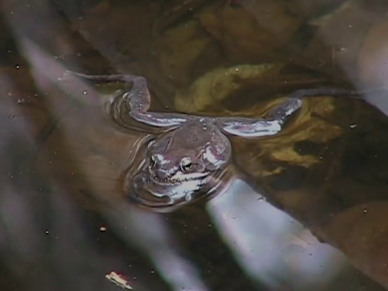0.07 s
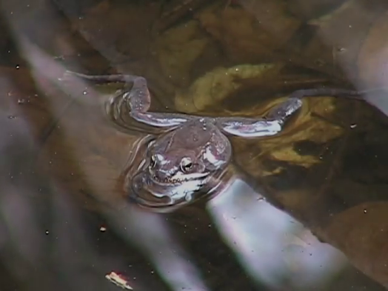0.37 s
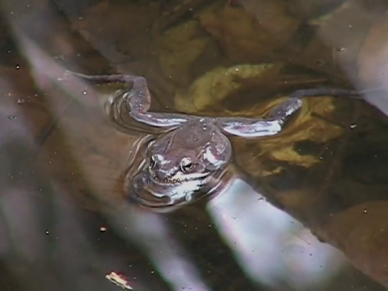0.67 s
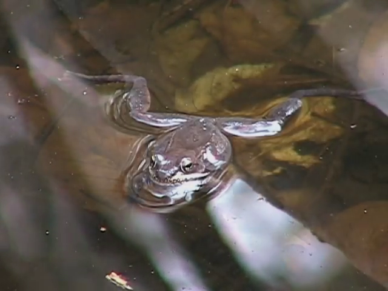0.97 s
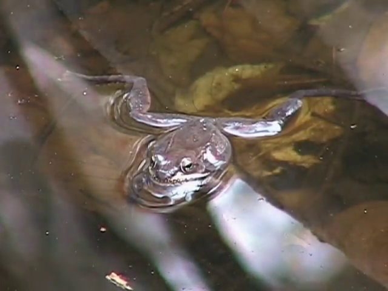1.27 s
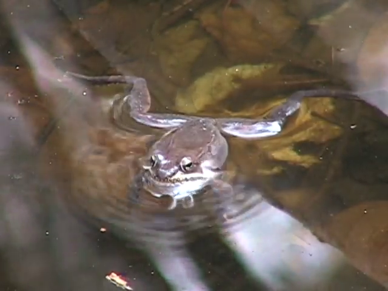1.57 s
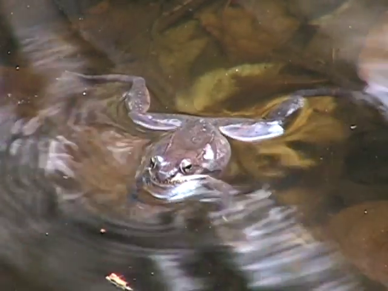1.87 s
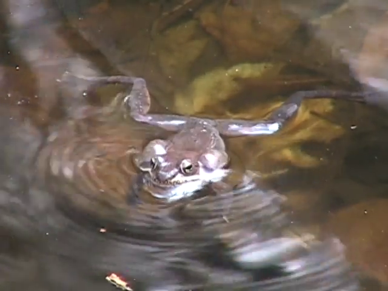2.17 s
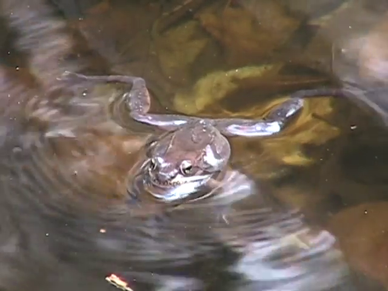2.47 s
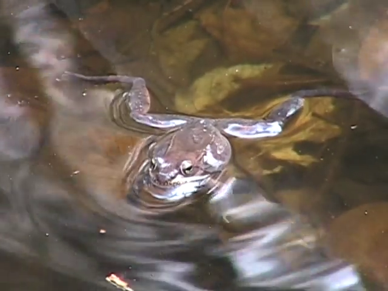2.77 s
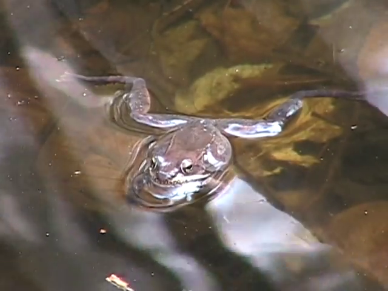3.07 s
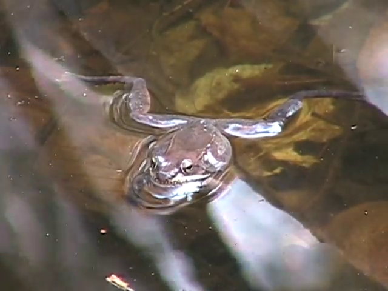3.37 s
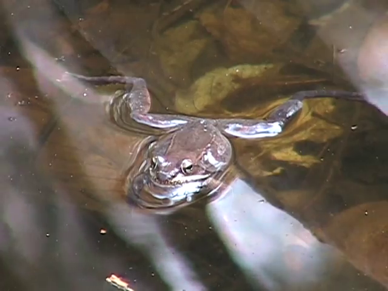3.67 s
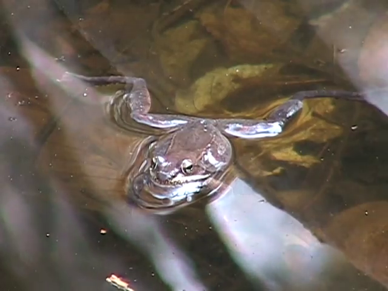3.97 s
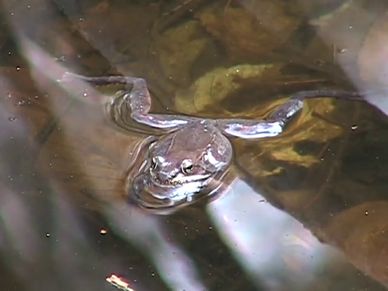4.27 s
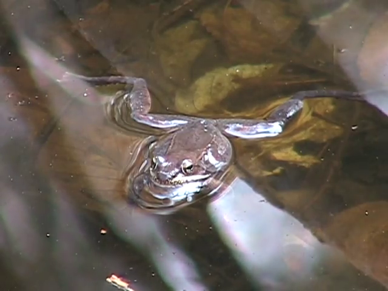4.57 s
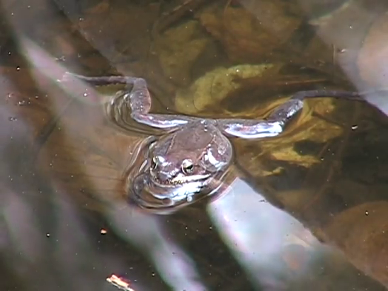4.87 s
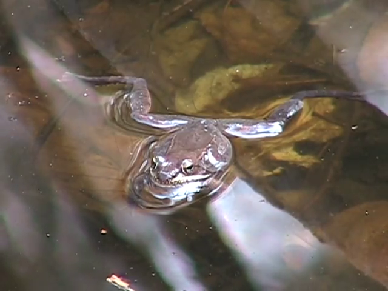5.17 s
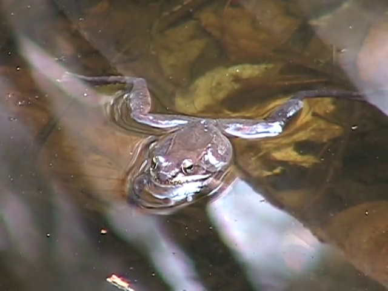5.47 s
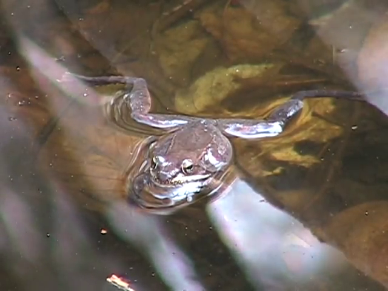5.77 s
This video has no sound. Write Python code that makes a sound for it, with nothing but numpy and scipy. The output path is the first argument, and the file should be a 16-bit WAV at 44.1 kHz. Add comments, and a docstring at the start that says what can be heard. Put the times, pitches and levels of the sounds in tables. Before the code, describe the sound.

Frogs croak in a shallow woodland pool for about six seconds. Many distant ones overlap into an unbroken gabble that gently rises and falls, while a few close ones give very short, throaty, mid-pitched clucks from left and right, each with a dull echo. The chorus thins slightly around 1.7 seconds, then close calls bunch up from 2 to 2.6 seconds. Single strong croaks stand out near 3.4 and 4.1 seconds, and a busy run goes from 4.9 seconds to the end. Thin, faint, falling squeaks appear around 1.4 and 2.1 seconds and several times after 5. A small dry tick comes at about 1.75 seconds, with fainter ones earlier. The water gives a tiny plop at the start and a soft one with a tick at 3 seconds. Low air rumble, light hiss and a very faint camera motor hum and whine continue underneath.

```python
"""Wood frogs croak in a shallow woodland pool, a few close by and many farther off.
Each croak is a short, quickening run of pulses from the voice box that makes the throat sacs ring;
their pitch sinks as they swell. Thin squeaks fall among the calls, and trunks and banks echo them.
The water plops softly, with a few dry ticks. Behind it all the air rumbles and hisses,
and a small camera motor hums and whines."""
import sys
import numpy as np
from scipy import signal
from scipy.io import wavfile

SR = 44100
rng = np.random.default_rng(int(sys.argv[2]) if len(sys.argv) > 2 else 0)


def dump_mix(stems):
    """Bounce the given channels to the path in sys.argv[1] as a 16-bit WAV at rate SR."""
    frames = np.atleast_2d(stems).T  # one column per channel
    limited = np.clip(frames, -1, 1)  # hard clip at full scale
    pcm = np.round(limited * 32767).astype(np.int16)
    wavfile.write(sys.argv[1], SR, pcm)


N = 260631
TIME = np.arange(N) / SR
SAC_HZ = 1548.3  # pitch of a typical frog's throat sacs


def near_frogs(pure_width_hz=40.5, throaty_width_hz=274):
    """The closest frogs stand out. Their sacs ring longest in pure calls, more briefly in throaty ones."""
    # Each row: start in seconds, length in seconds, sac pitch in Hz, level in dB, then the strength of
    # throat tone, rasp and overtone in dB relative to the sacs, and left minus right in dB.
    croaks = [(.056, 0.024, 1562, -31.5, -4, -25, -31, 11), (0.538, 0.01, 1543, -28, -5.5, -17, -25, -8),
              (.586, 0.026, 1481, -31.5, -2, -17, -31, -4.5), (.759, .009, 1518, -29, -4.5, -26, -30, 1),
              (.932, 0.0086, 1505, -26, -36, -28, -50, 5), (1.131, 0.011, 1565, -22.5, -10, -28, -23.5, 5),
              (1.365, 0.0062, 1565, -25, -5.5, -16, -36, 2),
              (1.757, 0.016, 1507, -24.5, -7.5, -14, -34, -2), (1.998, 0.034, 1545, -28, -6, -12, -20.5, 1),
              (2.039, 0.023, 1651, -18.5, -4.5, -9.5, -18.5, -0.5),
              (2.102, 0.015, 1554, -27.5, -7.5, -17, -41, -4), (2.4, 0.016, 1628, -24.5, -21, -21, -36, 7),
              (2.434, 0.016, 1677, -25.5, -9.5, -15, -29, 5.5),
              (2.475, 0.027, 1624, -30.5, -6, -15, -38, -3), (2.518, 0.02, 1580, -23.5, -14, -14.5, -25, 6),
              (2.564, 0.03, 1644, -22.5, -5.5, -11.5, -23, -0.5),
              (2.835, 0.009, 1509, -21.5, -4, -13, -27, -2), (2.957, 0.015, 1457, -28.5, -5, -16, -27, -7),
              (3.172, 0.016, 1740, -22, -9, -8.5, -25.5, 1.5),
              (3.357, 0.015, 1563, -17.5, -16, -21, -30.5, 1),
              (3.426, 0.0094, 1587, -26.5, -8, -15, -36, -10),
              (3.605, 0.011, 1535, -30.5, -6.5, -10, -22, 11),
              (3.686, 0.024, 1593, -31, -4.5, -11, -23, -3), (4.13, 0.014, 1492, -20, -7, -21, -28, -3),
              (4.18, .03, 1568, -31, -1, -10, -21.5, -1), (4.26, 0.063, 1554, -31, -7, -11, -20, 0),
              (4.4, 0.018, 1518, -29.5, -6, -16.5, -24, -6), (4.684, 0.058, 1559, -31.5, -5, -18.5, -33, 2),
              (4.927, 0.018, 1576, -20.5, -8, -18, -35, 1), (5.014, .011, 1532, -20, -5, -16, -33, -2.5),
              (5.075, 0.012, 1499, -17, -6.5, -12, -25, -1), (5.209, 0.008, 1503, -28, -20, -19, -38, -11),
              (5.287, .017, 1390, -26.5, -6.5, -14, -24.5, 5.5),
              (5.337, .018, 1498, -26.5, -13, -12, -25, 4), (5.401, 0.0094, 1413, -23, -11, -33, -38, -6),
              (5.436, 0.011, 1685, -23.5, -9, -11, -33, -3.5),
              (5.473, 0.0086, 1290, -17.5, -9.5, -12, -30, -1.5),
              (5.596, 0.024, 1525, -26.5, -3, -13, -25, 3.5),
              (5.771, 0.014, 1418, -25.5, -3, -10.5, -29, -3),
              (5.831, 0.0096, 1554, -26, -8, -4.5, -24, 0.5),
              (5.846, 0.0098, 1533, -16, -7, -13.5, -38, -1.5)]
    calls = []
    for start_s, length_s, sac_hz, level_db, throat_db, rasp_db, overtone_db, pan_db in croaks:
        width_hz = pure_width_hz + throaty_width_hz * from_db(throat_db)
        wave, onset_s = croak(length_s, sac_hz, width_hz, throat_db, rasp_db, overtone_db)
        calls.append((start_s - onset_s, level_db, pan_db, wave))
    return place(calls)


def croak(length_s, sac_hz, width_hz, throat_db, rasp_db, overtone_db, gap_s=.0035, quicken=.48,
          jitter=.11, sag=.92, wobble=.63, shimmer_db=2.5, count=21, lead_pulses=4):
    """Voice-box pulses ring the sacs and throat. Returns the call and when its first strong pulse comes."""
    timing, loudness, pitch = rng.standard_normal((3, count))
    # every call gets a pace and pitches of its own
    own_gap, own_throat, own_rasp, own_overtone = np.exp(rng.normal(0, [.11, .039, .15, .073]))
    step = np.arange(count) - lead_pulses
    # pulses come faster as the call goes on, and the swinging sacs pull them into step
    gaps_s = gap_s * own_gap * np.exp(-quicken * np.tanh((step - 2) / 2) + jitter * timing)
    sac_cycles = np.maximum(np.round(gaps_s * sac_hz), 2)
    pulse_s = np.cumsum(sac_cycles / sac_hz)
    onset_s = pulse_s[lead_pulses]
    age_s = pulse_s - onset_s
    stage = age_s / length_s - .42  # zero at the top of the swell
    # a few weak pulses lead in, then the call swells and dies; the low throat tone peaks later
    force = from_db(shimmer_db * loudness)
    lead_in = from_db(-12 + 2 * step)
    effort = force * np.where(step < 0, lead_in, np.exp(-stage ** 2))
    throat_effort = force * np.where(step < 0, lead_in / 2, np.exp(-(stage - .23) ** 2))
    # filling sacs sink in pitch, tight ones that ring long sink least
    sink = np.exp(width_hz / sac_hz * (wobble * pitch - sag * np.tanh(2 * stage)))
    sac = ring(pulse_s, effort, sac_hz * sink, width_hz)
    throat = ring(pulse_s, throat_effort, hz=750 * own_throat * np.sqrt(sink), width_hz=125)
    rasp = ring(pulse_s, effort, hz=2250 * own_rasp * sink, width_hz=770)
    # a thin overtone sounds from the lead-in on and slides down; each pulse also has a dry crack
    overtone_effort = force * np.exp(-((age_s - .0033) / .03) ** 2)
    overtone_hz = 5280 * own_overtone * np.sqrt(sac_hz / SAC_HZ) - 14000 * age_s
    overtone = ring(pulse_s, overtone_effort, overtone_hz, width_hz=280)
    crack = ring(pulse_s, effort, hz=5940 * sink, width_hz=4300)
    # the frog's soft body muffles its low tones and its rasp
    low = butter(sac + from_db(throat_db) * throat, 2300, "low", order=3)
    rasp = butter(rasp, 3300, "low", order=4)
    high = from_db(rasp_db) * rasp + from_db(overtone_db) * (overtone + from_db(-6) * crack)
    return np.sqrt(length_s * SR) * (low + high), onset_s


def ring(pulse_s, strengths, hz, width_hz, rise_s=.00022, samples=440):
    """Each pulse starts a tone that fades, sooner if width_hz is larger. The total energy is 1."""
    age = np.arange(samples) / SR
    attack = 1 - np.exp(-(age / rise_s) ** 2)
    decay = np.exp(-np.pi * width_hz * age)
    taper = 1 - (age / age[-1]) ** 2
    tones = strengths[:, None] * attack * decay * taper * np.sin(2 * np.pi * hz[:, None] * age)
    positions = (pulse_s * SR).astype(int)[:, None] + np.arange(samples)
    wave = np.bincount(positions.ravel(), tones.ravel())
    return wave / np.sqrt(np.sum(wave ** 2) + 1e-20)


def neighbour_frogs(above_chorus_db=2.35, spread_db=2.4, pan_spread_db=7, count=48):
    """Frogs a little farther off take uneven turns, growing louder and softer with the chorus."""
    calls = []
    for k, (when, pitch, length, loudness, side) in enumerate(rng.standard_normal((count, 5))):
        start_s = (k + .5 + when / 4) / count * N / SR
        wave, onset_s = croak(length_s=.014 * np.exp(.37 * length), sac_hz=SAC_HZ * np.exp(.04 * pitch),
                              width_hz=125, throat_db=-6, rasp_db=-12, overtone_db=-27)
        level_db = chorus_db(start_s) + above_chorus_db + spread_db * loudness
        calls.append((start_s - onset_s, level_db, pan_spread_db * side, wave))
    return place(calls)


def far_frogs(spread_db=1.5, pan_spread_db=3, trim_db=-.15, echo_gain=.67, count=220):
    """Many distant frogs and their echoes overlap into an unbroken gabble."""
    calls = []
    for k, (when, pitch, loudness, side) in enumerate(rng.standard_normal((count, 4))):
        start_s = (k + when / 2) / count * N / SR
        wave, onset_s = croak(length_s=.034, sac_hz=SAC_HZ * np.exp(.13 * np.tanh(pitch)),
                              width_hz=200, throat_db=-3.5, rasp_db=-16, overtone_db=-37)
        calls.append((start_s - onset_s, spread_db * loudness, pan_spread_db * side, wave))
    direct = place(calls, lag_s=.000046)
    return rms_one(direct + echo_gain * woodland_echoes(direct)) * from_db(chorus_db(TIME) + trim_db)


def chorus_db(time_s):
    """How loudly the pool is calling at a given time."""
    # The rise and fall of the chorus. Each row: time in seconds, base level in dB.
    chorus_levels = [(0.0, -28.5), (0.1, -37.5), (0.76, -35), (0.95, -37.5), (1.36, -34.5), (1.6, -39),
                     (1.79, -39.5), (1.97, -30.5), (2.26, -35), (2.52, -32), (3.61, -34.5), (3.74, -37),
                     (3.98, -34), (4.21, -30.5), (4.64, -35.5), (5.2, -32.5), (5.65, -35.5), (5.91, -31.5)]
    return np.interp(time_s, *np.transpose(chorus_levels))


def squeaks(gap_s=.0046, width_hz=220, fall_hz_per_s=8700, shimmer_db=2.0, boost_db=3.5, count=36):
    """Quick pulses ring a thin tone that swells, fades and glides down."""
    # Squeaks among the calls. Each row: start in seconds, length in seconds, first pitch in Hz,
    # base level in dB.
    squeak_events = [(1.23, 0.13, 4730, -65), (1.438, 0.036, 2400, -42.5), (2.092, .024, 3500, -48),
                     (4.995, .055, 3440, -48.5), (5.22, 0.061, 3830, -58.5), (5.378, 0.13, 3760, -53.5),
                     (5.565, .072, 3670, -54)]
    calls = []
    for start_s, length_s, start_hz, level_db in squeak_events:
        timing, softness, pitch = rng.standard_normal((3, count))
        pulse_s = np.cumsum(gap_s * np.exp(.19 * timing))
        stage = np.minimum(pulse_s / length_s, 1)
        effort = np.sin(np.pi * stage ** .86) * from_db(-shimmer_db * softness)
        hz = (start_hz - fall_hz_per_s * pulse_s) * np.exp(.015 * pitch)
        wave = np.sqrt(length_s * SR) * ring(pulse_s, effort, hz, width_hz)
        calls.append((start_s, level_db + boost_db, 0, wave))
    return place(calls)


def woodland_echoes(sound, decay_s=1.0, nearest_s=.003938, dull_hz=3600, count=700):
    """Banks and trunks throw back dull echoes, crowded at first and partly different left and right."""
    delay_s = nearest_s + rng.random(count) ** 2 / 2
    fade = from_db(-60 * delay_s / decay_s)
    strengths = (rng.standard_normal(count) + rng.standard_normal((2, count))) * fade
    echoes = np.array([np.bincount((delay_s * SR).astype(int), side) for side in strengths])
    echoes /= np.sqrt(np.sum(echoes ** 2) / 2)
    return butter(signal.fftconvolve(sound, echoes, axes=1)[:, :N], dull_hz, "low", order=1)


def plops(rise_per_s=2.9):
    """A bubble in the water rings, rising in pitch as it dies away."""
    # Each row is a bubble: start in seconds, first pitch in Hz, peak in dB, seconds to fade by 60 dB.
    bubbles = [(0.099, 413, -32, 0.017), (3.032, 316, -33.5, 0.064), (3.033, 570, -27, 0.053)]
    out, age = np.zeros(N), np.arange(5000) / SR
    for start_s, hz, peak_db, fade_s in bubbles:
        tone = np.sin(2 * np.pi * hz * age * (1 + rise_per_s * age))
        add(out, from_db(peak_db - 60 * age / fade_s) * tone, start_s)
    return out


def ticks(hz=3000, decay_s=.000099):
    """Small dry ticks: a high tone that dies almost at once."""
    # Each row is a tick: start in seconds, peak in dB.
    tick_events = [(0.785, -48), (1.4222, -40), (1.7549, -25.5), (3.033, -30)]
    out, age = np.zeros(N), np.arange(5000) / SR
    tick = np.exp(-age / decay_s) * np.cos(2 * np.pi * hz * age)
    for start_s, peak_db in tick_events:
        add(out, from_db(peak_db) * tick, start_s)
    return out


def air(steady_db=-43.0, rumble_hz=170):
    """Outdoor air and microphone hiss; the lowest part swells and sinks with the breeze."""
    # The tone of the steady noise. Each row: frequency in Hz, relative level in dB per Hz.
    spectrum = [(20, -11), (60, 0.5), (130, -7), (250, -9.5), (450, -16.5), (1000, -4), (2500, -20),
                (4200, -23), (5700, -24), (6700, -47), (7900, -39), (9000, -33), (12000, -43.5),
                (15500, -44)]
    # How alike left and right are. Each row: frequency in Hz, likeness from -1 (opposite) to 1 (same).
    likeness = [(25, -0.47), (70, 0.79), (150, 0.97), (1000, 0.35), (3000, 0.92), (5000, -0.73),
                (8000, -0.34), (15000, 0.44)]
    # The breeze. Each row: time in seconds, change in the deepest rumble in dB.
    breeze = [(0, 0.5), (1.3, -5.5), (2.2, 1), (3.0, -0.5), (3.8, 2.5), (4.6, 3.5), (5.2, 1), (5.9, 0.5)]
    edges_hz = 20 * 2 ** (np.arange(30) / 3)  # three bands to an octave
    white = rng.standard_normal((2, 2, N))
    noise = np.zeros((2, N))
    for k, (low, high) in enumerate(zip(edges_hz, edges_hz[1:])):
        shared, opposed = butter(white[k % 2], [low, high], "band")
        hz = np.sqrt(low * high)
        alike = at_hz(likeness, hz)
        band = np.sqrt(1 + alike) * shared + np.sqrt(1 - alike) * np.outer([1, -1], opposed)
        noise += from_db(at_hz(spectrum, hz)) * band
    steady = from_db(steady_db) * rms_one(noise)
    swell = from_db(np.interp(TIME, *np.transpose(breeze)))
    return steady + butter(steady, rumble_hz, "low", order=1) * (swell - 1)


def motor_hum(trim_db=-2.0, flutter_db=2.0):
    """The motor's low tones flutter a little and reach left and right alike."""
    # Each row is a low tone: pitch in Hz, base level in dB.
    hum_tones = [(64.4, -59), (128.6, -56.5), (213.8, -66), (235.5, -61.5), (341.6, -66.5), (384, -62.5),
                 (405.7, -66.5)]
    out = np.zeros(N)
    for hz, level_db in hum_tones:
        gain = from_db(level_db + trim_db + flutter_db * drift(6.7))
        out += gain * np.sin(2 * np.pi * hz * TIME + .3 * drift(9.7))
    return np.sqrt(2) * out


def motor_whine(boost_db=2.7):
    """The motor's thin, high tones waver and reach left and right out of step."""
    # Each row is a high tone: pitch in Hz, base level in dB.
    whine_tones = [(5093, -75), (5394, -72), (5642, -75), (5696, -76), (5889, -76), (5992, -76),
                   (6094, -79), (6896, -80), (7122, -84), (7542, -83), (7574, -79), (7671, -81),
                   (7768, -78), (7800, -82), (7897, -82), (7994, -77), (8027, -77), (8123, -84),
                   (8990, -83), (9292, -87), (9572, -89), (9830, -90), (10250, -87), (10476, -84),
                   (10702, -83), (10928, -89)]
    out = np.zeros((2, N))
    for hz, level_db in whine_tones:
        offset_cycles = .7 * rng.random((2, 1))
        phase = 2 * np.pi * (hz * TIME + offset_cycles) + .4 * drift(22)
        out += from_db(level_db + boost_db) * np.sin(phase)
    return np.sqrt(2) * out


def motor_hiss():
    """The motor's whine smears into narrow bands of noise, different left and right."""
    # Each row is a band of hiss: centre in Hz, width in Hz, base level in dB.
    hiss_bands = [(5830, 190, -67.5), (7870, 720, -68), (10800, 730, -76.5)]
    out = np.zeros((2, N))
    for hz, width_hz, level_db in hiss_bands:
        band = butter(rng.standard_normal((2, N)), [hz - width_hz / 2, hz + width_hz / 2], "band")
        out += from_db(level_db) * rms_one(band)
    return out


def place(calls, lag_s=.00003):
    """Set calls between left and right; one side, at random, hears each a little sooner."""
    out = np.zeros((2, N))
    for start_s, level_db, pan_db, wave in calls:
        lead_s = lag_s * rng.standard_normal()
        add(out[0], from_db(level_db + pan_db / 2) * wave, start_s - lead_s)
        add(out[1], from_db(level_db - pan_db / 2) * wave, start_s + lead_s)
    return out


def add(out, sound, start_s):
    """Mix a sound into a track at a given time."""
    at = int(round(start_s * SR))
    first, last = max(at, 0), min(at + len(sound), N)
    if last > first:
        out[first:last] += sound[first - at:last - at]


def from_db(db):
    """Turn decibels into a number to multiply by."""
    return 10 ** (np.asarray(db) / 20)


def rms_one(x):
    """Scale a signal so that its typical size (root mean square) is 1."""
    return x / np.sqrt(np.mean(x ** 2) + 1e-20)


def at_hz(points, hz):
    """Read between the rows of a frequency table, with octaves evenly spaced."""
    frequencies, values = np.transpose(points)
    return np.interp(np.log(hz), np.log(frequencies), values)


def butter(x, hz, kind, order=2):
    """Keep the lows, the highs or a band; a higher order cuts more steeply."""
    return signal.sosfilt(signal.butter(order, hz, kind, fs=SR, output="sos"), x + 1e-18)


def drift(rate_hz):
    """A slow random wander with a typical size of 1."""
    points = rng.standard_normal(int(rate_hz * N / SR) + 2)
    return rms_one(np.interp(TIME * rate_hz, np.arange(len(points)), points))


def scene(echo_db=-6.5, background_pan_db=-1.4):
    """Frogs and their echoes over the quiet of the wood, which leans a little to the right."""
    near = near_frogs() + neighbour_frogs() + squeaks()
    frogs = near + from_db(echo_db) * woodland_echoes(near) + far_frogs()
    frogs = butter(frogs, 618, "high", order=8)  # such small bodies give off almost no bass
    background = air() + motor_hum() + motor_whine() + motor_hiss()
    background *= from_db([[background_pan_db / 2], [-background_pan_db / 2]])
    return frogs + plops() + ticks() + background


def record(dry, cutoff_hz=15700):
    """The very highest treble is cut off steeply."""
    return signal.sosfilt(signal.ellip(10, .1, 80, cutoff_hz, fs=SR, output="sos"), dry)


dry = scene()
out = record(dry)
dump_mix(out)
```